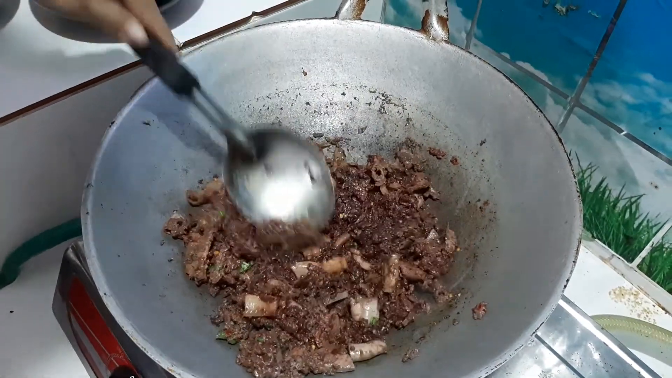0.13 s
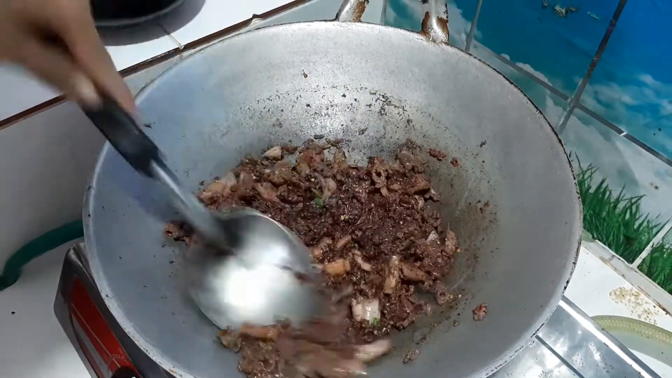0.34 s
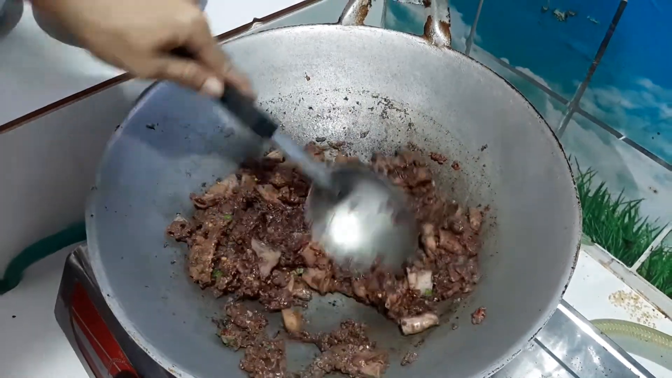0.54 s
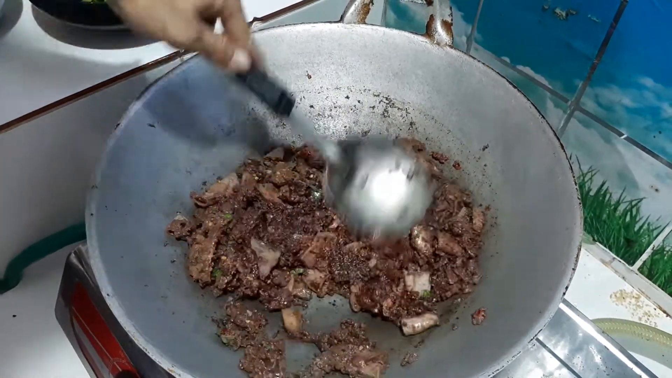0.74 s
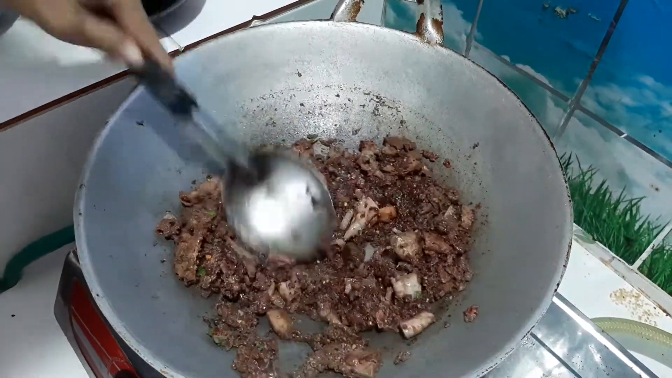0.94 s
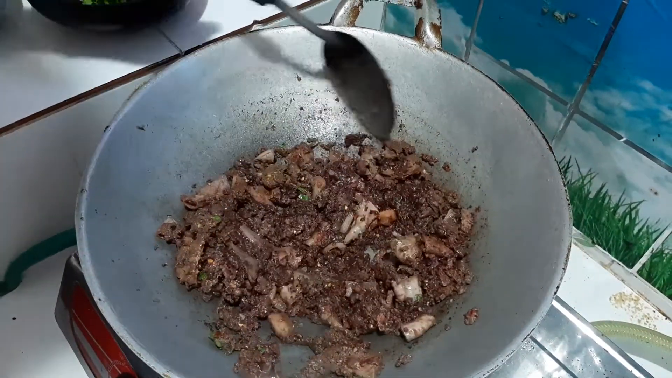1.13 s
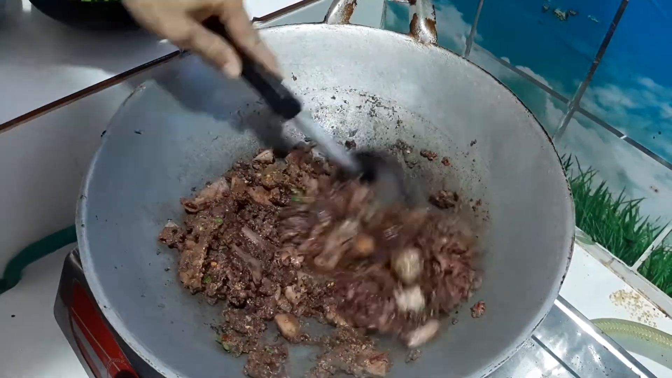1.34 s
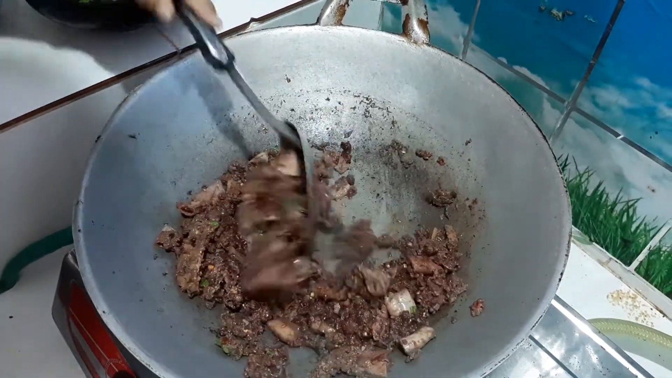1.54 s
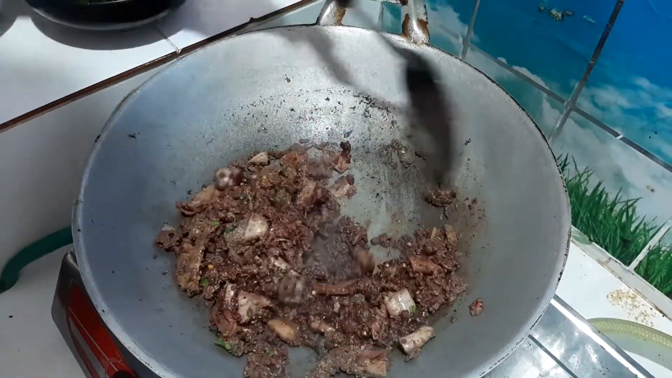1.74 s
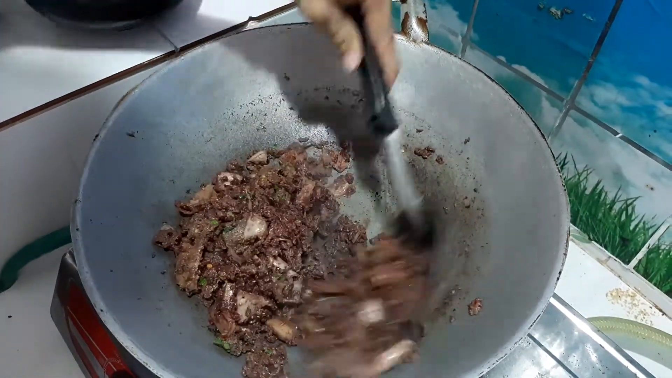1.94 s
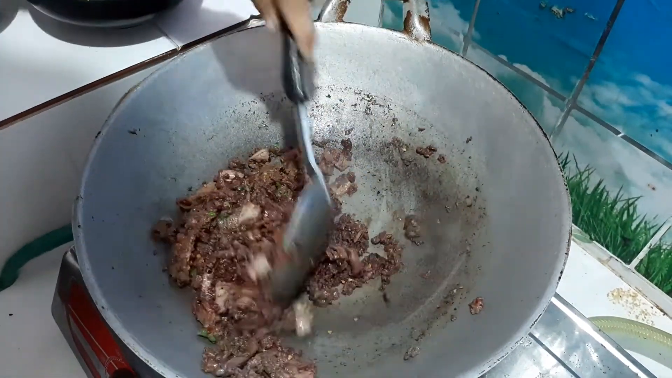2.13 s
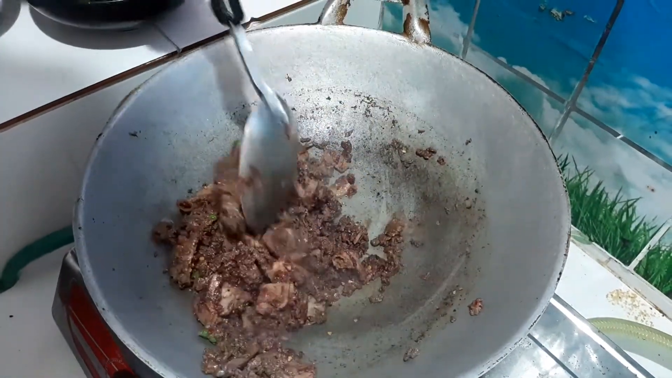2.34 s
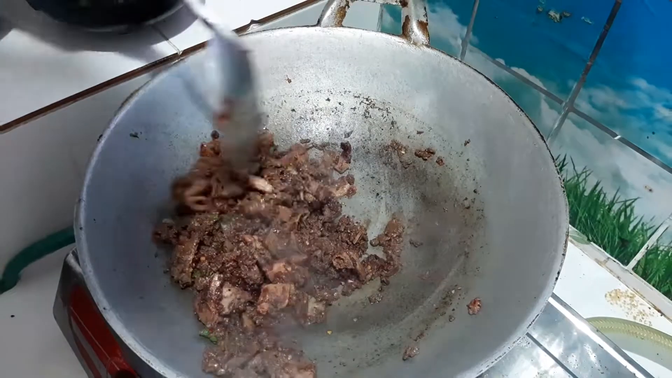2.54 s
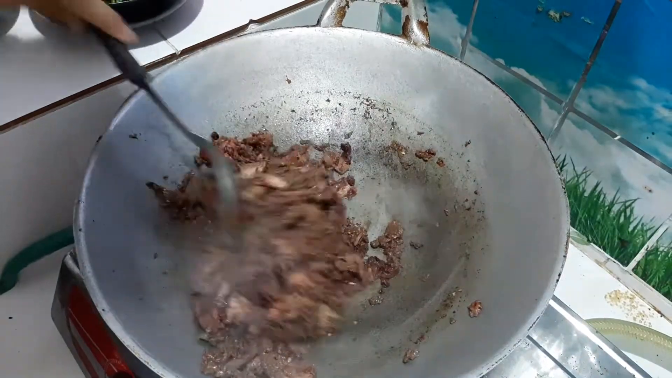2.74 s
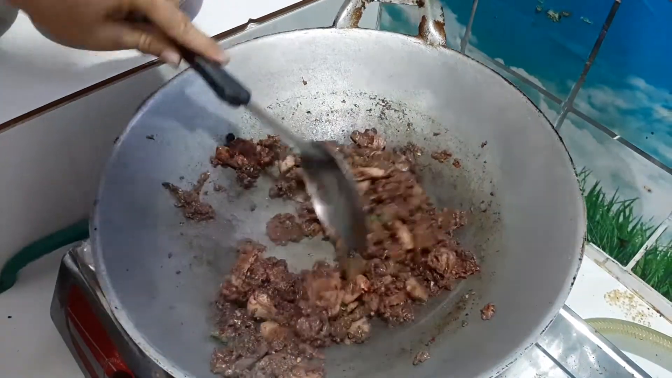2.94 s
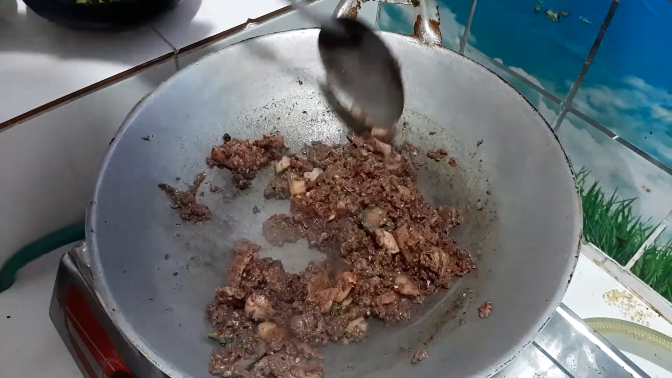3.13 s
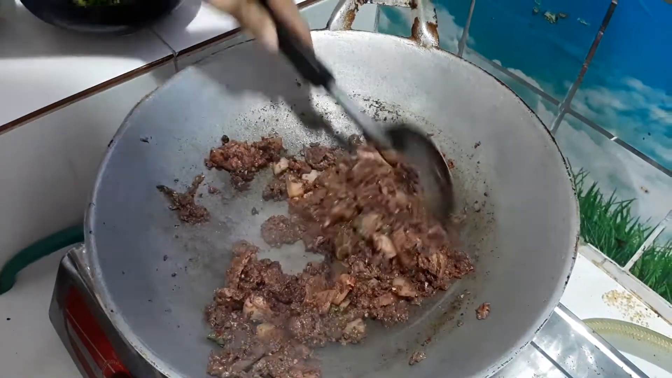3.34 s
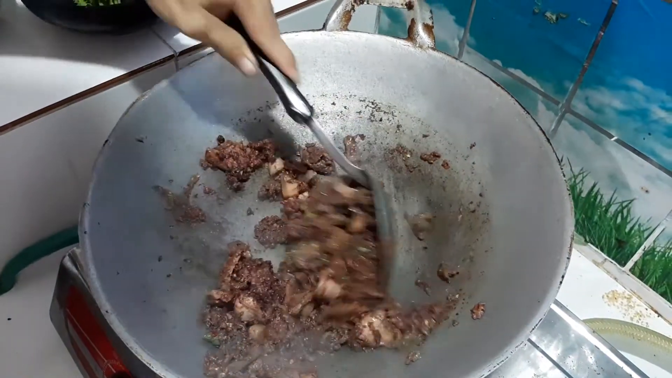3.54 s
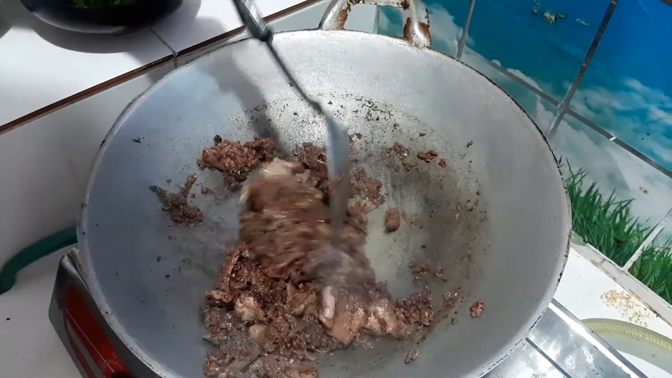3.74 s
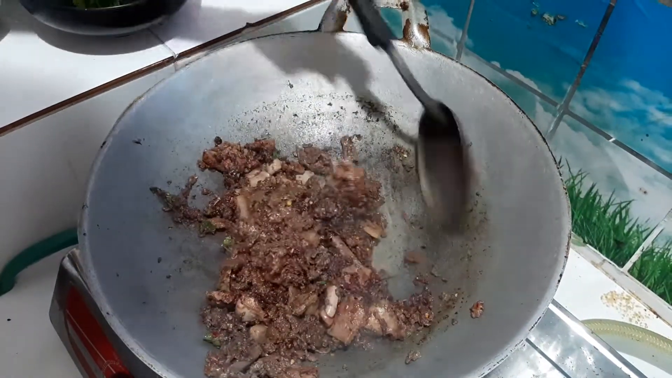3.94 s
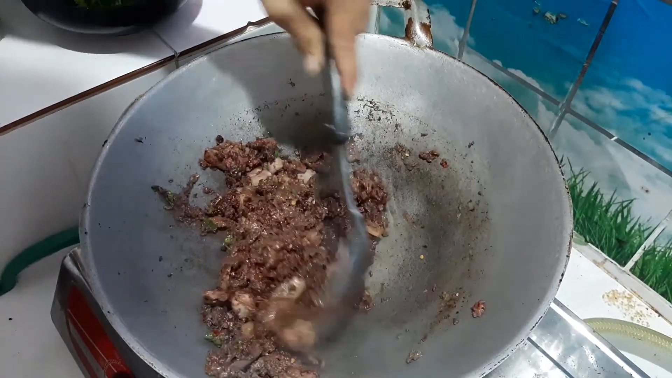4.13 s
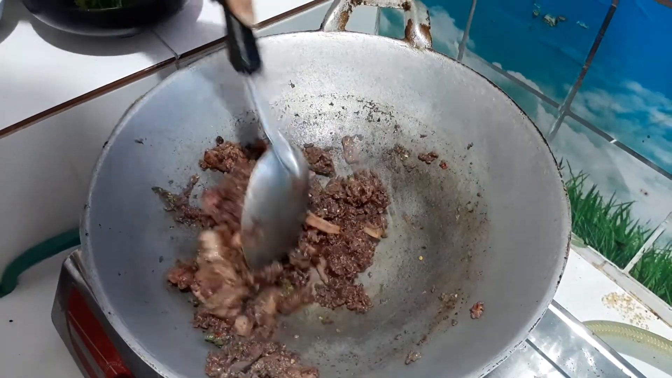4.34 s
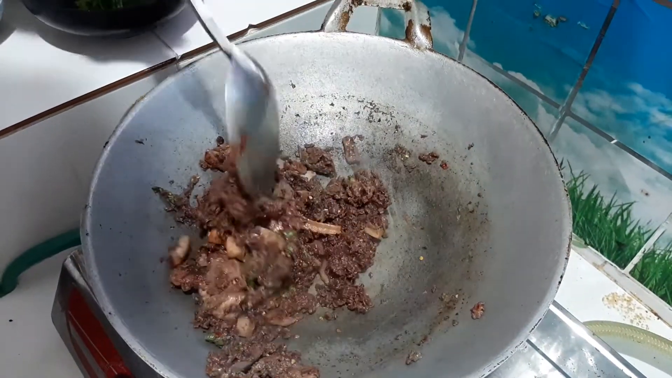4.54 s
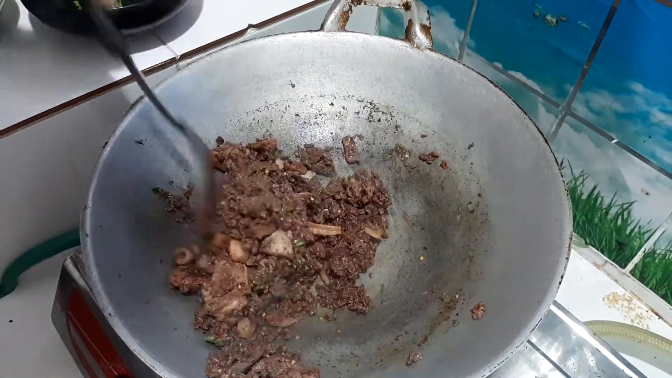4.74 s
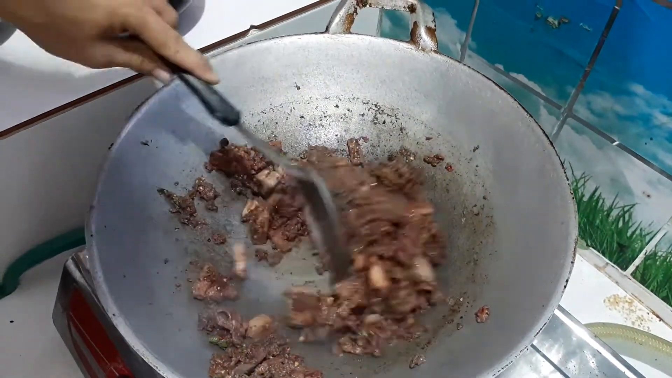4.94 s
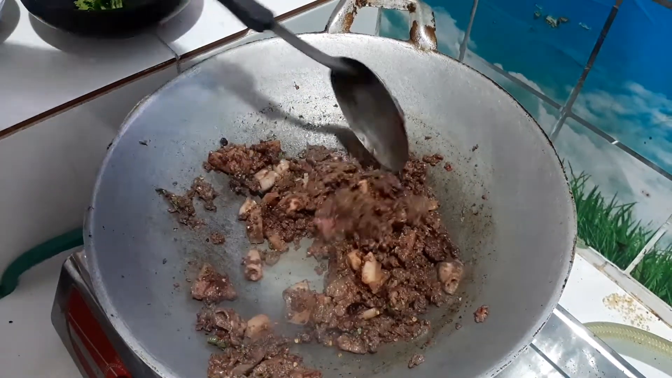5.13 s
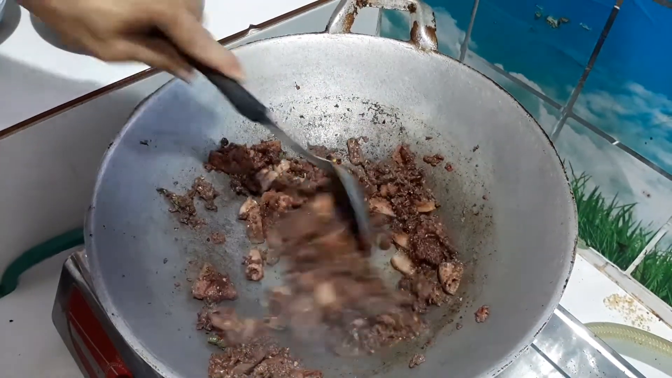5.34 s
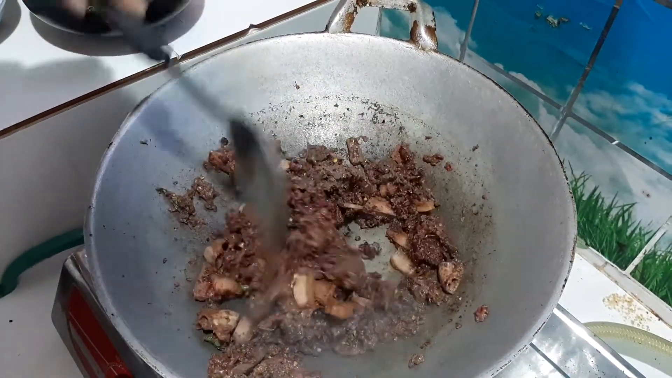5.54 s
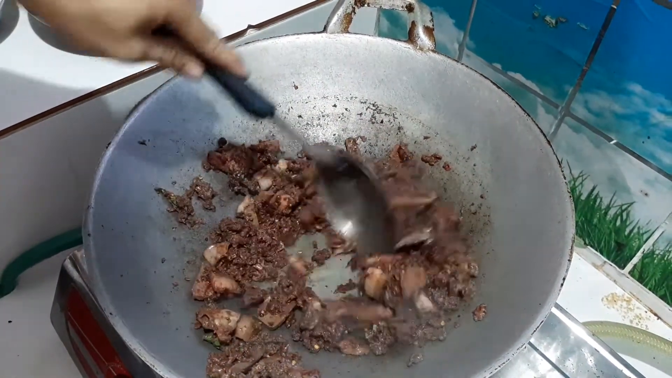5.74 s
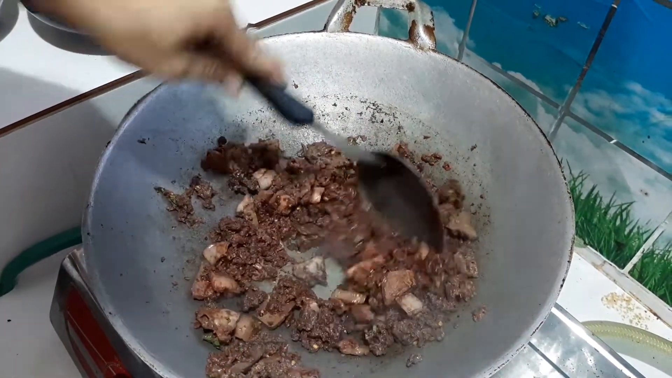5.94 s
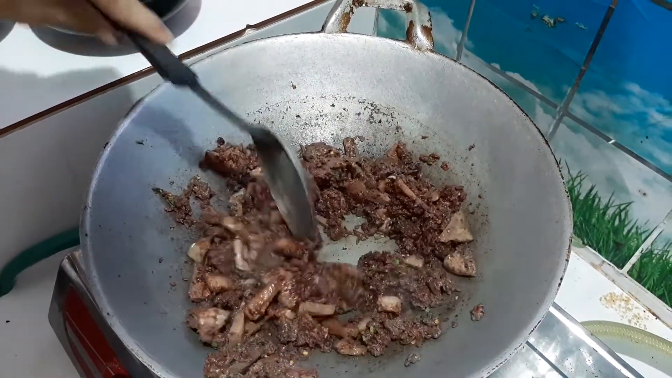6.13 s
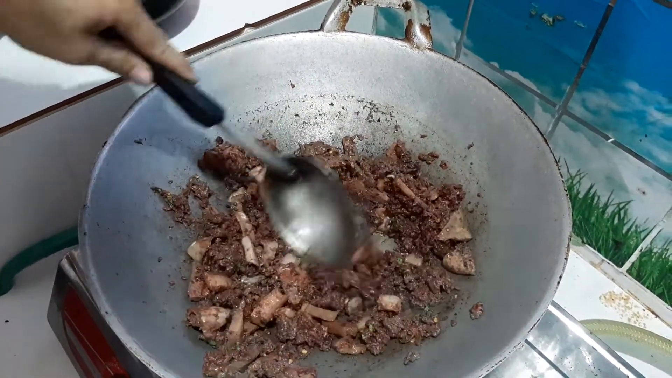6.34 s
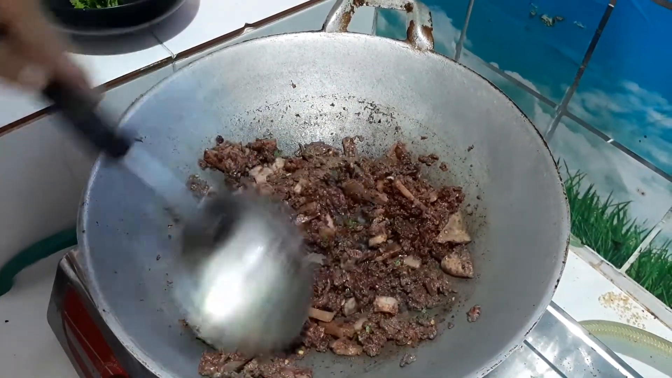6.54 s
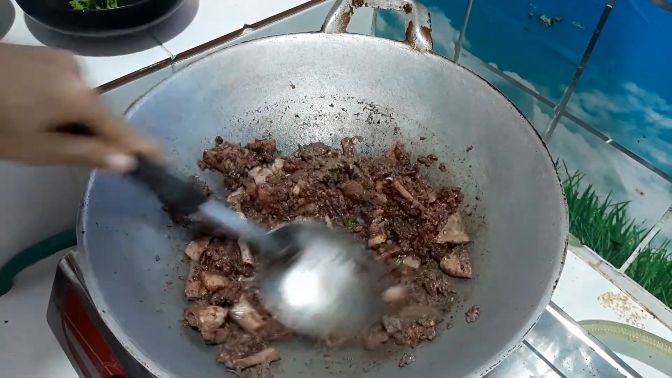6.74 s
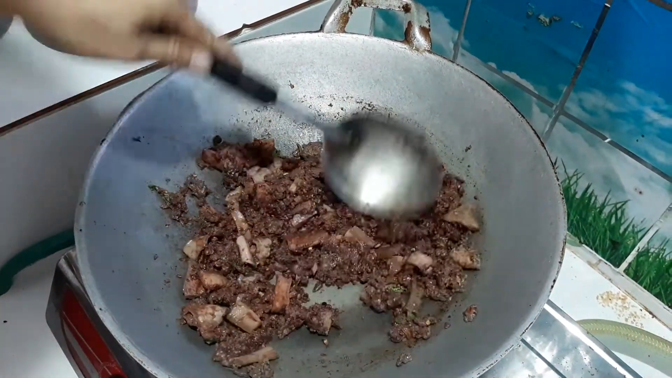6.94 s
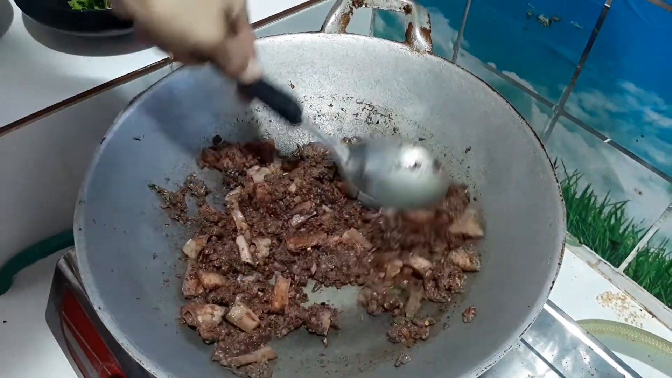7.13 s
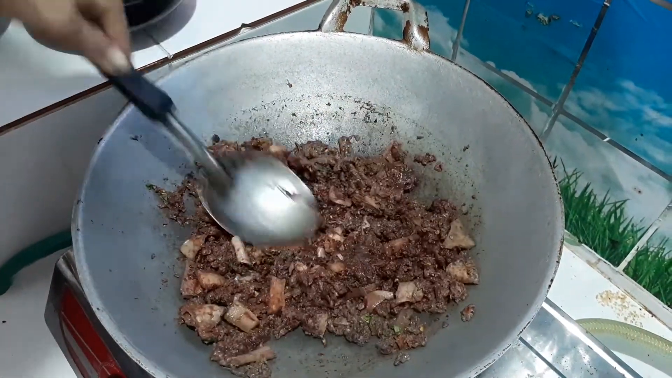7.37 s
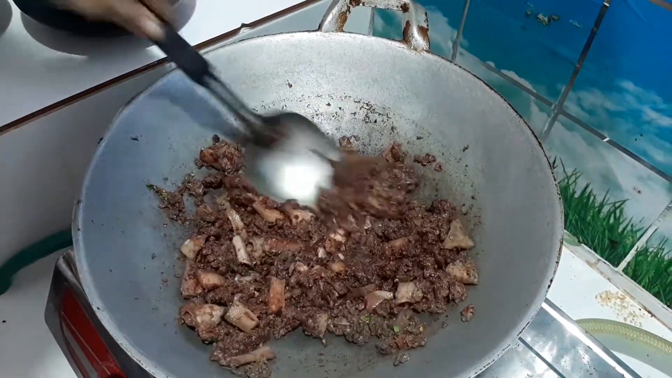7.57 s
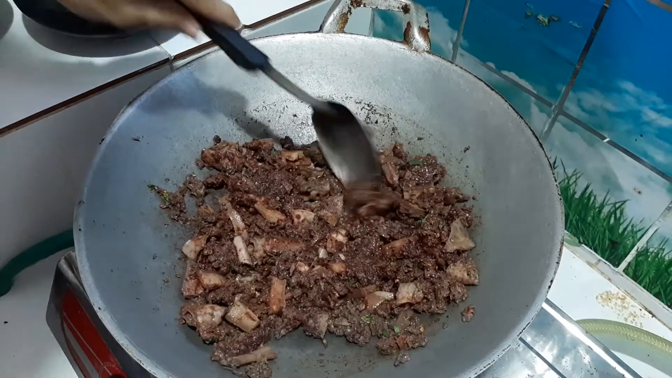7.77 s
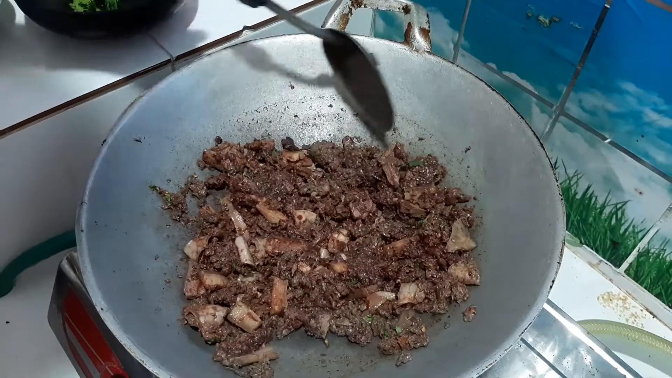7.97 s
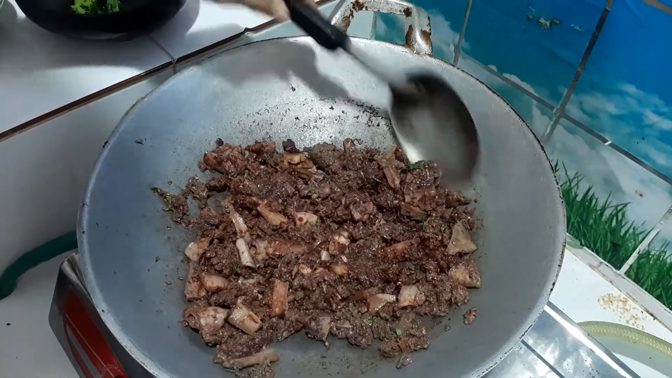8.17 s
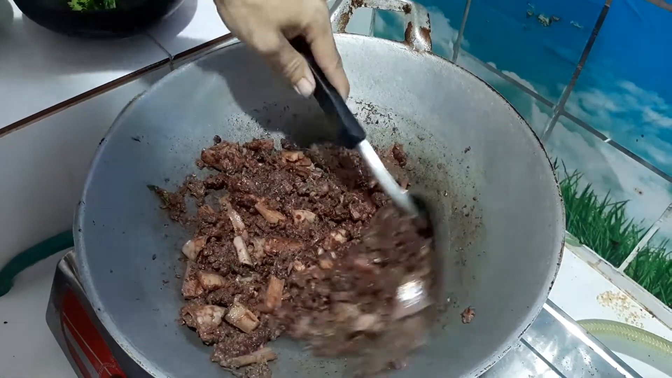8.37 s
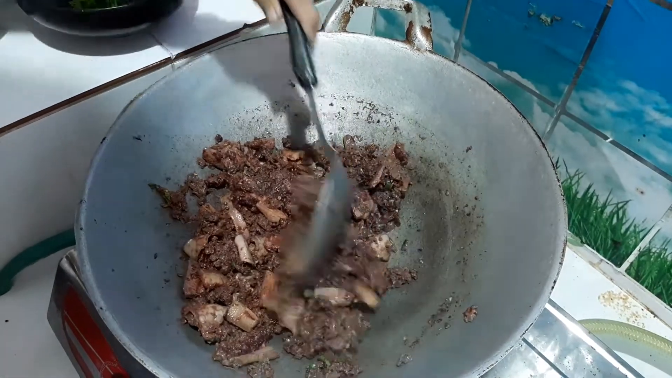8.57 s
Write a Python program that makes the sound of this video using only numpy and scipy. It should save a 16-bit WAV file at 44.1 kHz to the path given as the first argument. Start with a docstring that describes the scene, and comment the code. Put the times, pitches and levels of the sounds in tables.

```python
"""Minced meat sizzles in an aluminium wok on a gas stove, in a small hard-walled kitchen.
Noise and random impulses, shaped in spectrum and level, make the sizzle, which flares as wet meat meets
hot metal; decaying sines make the pops. A steel ladle knocks (decaying modes), scrapes (impulses through
resonances), shoves and groans (a windowed sine), and moist meat squelches (soft impulses).
Low noise rumbles as the gas flame; decaying noise gives the ladle's sounds and the pops their room."""
import sys
import numpy as np
from scipy import signal
from scipy.fft import rfft, irfft, next_fast_len
from scipy.io import wavfile
from scipy.ndimage import map_coordinates

SR = 44100
rng = np.random.default_rng(int(sys.argv[2]) if len(sys.argv) > 2 else 0)


def bounce(signal):
    """Save signal as a 16-bit WAV file at the path given by the first command-line argument."""
    frames = np.transpose(np.atleast_2d(signal))
    limited = np.clip(frames, -1, 1)
    pcm = np.round(limited * 32767).astype(np.int16)
    wavfile.write(sys.argv[1], SR, pcm)


N = 379361


# spectrum of the fine fizz: (f/Hz, relative density/dB per Hz)
FIZZ_SPECTRUM = [(1500, -42), (4000, -11), (6500, -4), (8500, -5), (10500, -2), (12200, 0.5), (14000, -0.2),
                 (16000, -3.5)]
# spectrum of the coarser bubbling: (f/Hz, relative density/dB per Hz)
BUBBLING_SPECTRUM = [(100, -23), (300, -9.5), (550, -5), (900, -2), (1400, 1), (1900, 0), (2600, 0.5),
                     (3600, 1.5), (5500, 0.5), (8500, -9.5), (16000, -22.5)]


def sizzle():
    """Superposition: countless bursts merge into a hiss, with the stronger ones crackling on top."""
    fizz_db, bubbling_db = frying()
    flutter_db = 0.43 * wobble(14)  # shared by both layers

    fine = rng.standard_normal((2, N)) + amp(-9.5) * bursts(rate=5000, spread_db=7, life=0.0028)
    fizz = coloured(paired(bowl(fine, echo_db=-26.5)), FIZZ_SPECTRUM)
    fizz_gain = amp(fizz_db + 0.72 + flutter_db + 0.65 * wobble(40))

    coarse = rng.standard_normal((2, N)) + amp(-4) * bursts(rate=1800, spread_db=2.5, life=0.0048)
    bubbling = coloured(paired(bowl(coarse, echo_db=-20.5)), BUBBLING_SPECTRUM)
    bubbling_gain = amp(bubbling_db - 1.5 + flutter_db + 0.58 * wobble(25))
    return fizz_gain * fizz + bubbling_gain * bubbling


# wet meat meets hot metal, flares and dries:
# (start t/s, rise t/s, hold t/s, relative fizz level/dB, relative bubbling level/dB, drying rate/dB per s)
FLARE_EVENTS = [(0.0, 0.8, 0.38, -36, -35, 20), (0.68, 0.11, 0.02, -38, -43, 42),
                (1.3, 0.066, 0.02, -37, -42, 55), (2.465, 0.1, 0.31, -25.5, -32, 8.5),
                (3.24, 0.035, 0.01, -26, -42, 63), (3.953, 0.44, 0.19, -38, -41, 14),
                (4.88, 0.1, 0.14, -37, -59, 0), (5.713, 0.056, 0.41, -36, -41, 0.5),
                (6.3, 0.82, 0.36, -35, -37.5, 3), (7.467, 0.091, 0.12, -32.5, -37, 10),
                (8.07, 0.066, 0.04, -30.5, -35, 19)]
REST_FIZZ_DB, REST_BUBBLING_DB = -37, -38  # between stirs, on the same scale


def frying():
    """Power addition: each flare rises, holds and dries away on top of the resting sizzle; levels in dB."""
    t = np.arange(N) / SR
    power = amp([[REST_FIZZ_DB], [REST_BUBBLING_DB]]) ** 2
    for start, rise, hold, fizz_db, bubbling_db, drying in FLARE_EVENTS:
        onset = np.clip((t - start) / rise, 0, 1)
        drying_time = np.maximum(t - start - rise - hold, 0)
        flare = onset * amp(-drying * drying_time)
        power = power + (amp([[fizz_db], [bubbling_db]]) * flare) ** 2
    return 10 * np.log10(power)


def bursts(rate, spread_db, life, count=3):
    """Impulse response: steam bubbles burst at several spots; the bowl smears each into a tiny crackle."""
    t = np.arange(SR // 100) / SR
    total = 0
    for _ in range(count):
        smear = rng.standard_normal((2, len(t))) * amp(-60 * t / life)  # life is a t60 in s
        total = total + through(impulses(rate / count, spread_db), smear)
    return unit(total)


def bowl(x, echo_db, count=8):
    """Early reflection: x with a cluster of quick echoes off the wok's wall."""
    taps = np.zeros((2, SR // 150))
    for side in taps:
        delays = rng.integers(SR // 2000, len(side), count)
        side[delays] = amp(echo_db) * rng.choice([-1, 1], count)
    return x + through(x, taps)


# single fat bubbles bursting near the top of the meat: (t/s, f/Hz, relative peak level/dB)
LOUD_POPS = [(0.062, 1600, -28), (.627, 2100, -37), (6.346, 1490, -31)]


def pops(pitch_hz=2600, size_db=-43, cycles=28, count=240):
    """Damped oscillation: larger bubbles ping briefly, falling 60 dB in a set number of cycles."""
    out, t = np.zeros((2, N)), np.arange(SR // 25) / SR
    # faint ones are scattered throughout, within two octaves of pitch_hz
    faint = [(u * N / SR, pitch_hz * 4 ** (2 * v - 1), size_db + 8 * w ** 3)
             for u, v, w in rng.random((count, 3))]
    for s, hz, db in [*LOUD_POPS, *faint]:
        ping = np.sin(2 * np.pi * (hz * t + rng.random((2, 1))))
        add(out, s, amp(db - 60 * t * hz / cycles) * ping)
    return kitchen(out, wet_db=-9)


# the ladle lands; the spot decides which modes ring: (t/s, then relative levels of
# boom level/dB, bong level/dB, clang level/dB, clack level/dB, crack level/dB, tick level/dB)
KNOCK_EVENTS = [(1.159, -32, -30.5, -29.5, -28, -18.5, -30), (1.8044, -31.5, -30, -43, -30.5, -20, -22),
                (3.244, -33, -34.5, -29, -24, -26.5, -39), (3.979, -34, -29.5, -40, -33.5, -29.5, -48),
                (3.992, -47, -44, -41, -34, -26.5, -29.5), (4.789, -31, -23.5, -22.5, -27.5, -23.5, -29.5),
                (7.138, -49, -42.5, -45, -42, -44, -48), (8.102, -40, -40, -36.5, -34, -39, -45)]
# those six families of modes, boom to tick: (lower f/Hz, upper f/Hz)
MODE_FAMILIES = [(100, 380), (380, 780), (780, 1700), (1700, 2800), (2800, 7800), (7800, 16000)]


def knocks(chatter=0.0029, clink_db=22):
    """Modal excitation: each blow of the ladle wakes the families of modes in its own proportion."""
    out, t = np.zeros((2, N)), np.arange(SR // 2) / SR
    for s, *levels in KNOCK_EVENTS:
        ring = wok(dense_db=19.5, dense_t60=0.04, scatter_db=0.5) + amp(clink_db) * ladle_ring(t)
        # steel chatters on the wall for a moment, so the ring takes that long (s) to build
        ring = ring * np.sqrt(1 - np.exp(-t / chatter))
        for band, db in zip(MODE_FAMILIES, levels):
            family = signal.sosfilt(signal.butter(3, band, "band", fs=SR, output="sos"), ring)
            strike_rms = np.std(family[:, :SR // 40])
            add(out, s, amp(db) * family / strike_rms)
    return kitchen(amp(1) * out, wet_db=-7.5)


# the wok's clear modes: (f/Hz, relative level/dB, t60/s)
WOK_MODES = [(125.3, -4, 0.41), (189.7, -4, 0.3), (214.9, -0.5, 0.31), (230.8, 0.5, 0.22), (273, -6, .25),
             (301.5, 3.5, 0.24), (325, 0, 0.17), (384, -9.5, 0.2), (471, -5, 0.28), (496.3, 1, 0.28),
             (582.4, 0, 0.23), (689, -2.5, 0.21), (742, 0.5, 0.1), (874, -0.5, 0.089), (1008, -0.5, .13),
             (1372, -10.5, 0.17), (1492, -5, 0.094), (2290, 18.5, 0.021), (3000, -28, 0.14),
             (3480, 1, 0.11), (3870, 4.5, 0.097), (4240, -6, 0.078), (4830, 5, 0.062), (5364, 4, 0.05)]


def wok(dense_db, dense_t60, scatter_db=2.0, port_hz=1500):
    """Modal superposition: the wok's clear modes from one spot over a crowd of short-lived ones."""
    t = np.arange(SR // 2) / SR
    ring = amp(dense_db - 60 * t / dense_t60) * paired(rng.standard_normal((2, len(t))))
    for hz, db, t60 in WOK_MODES:
        # higher modes reach left and right further out of step, up to a quarter cycle from port_hz
        lag = np.array([[1], [-1]]) * rng.choice([-1, 1]) * min(hz / port_hz, 1) * np.pi / 4
        level_db = db + scatter_db * rng.standard_normal() - 60 * t / t60
        ring += rng.choice([-1, 1]) * amp(level_db) * np.sin(2 * np.pi * hz * t + lag)
    return ring


# broad resonances of the ladle's bowl, pressed against the wok; scrapes ring them too:
# (f/Hz, width f/Hz, relative level/dB)
LADLE_RESONANCES = [(670, 120, -13), (1460, 150, -11.5), (2360, 400, -8), (3094, 310, -6),
                    (3596, 260, -2.5), (4234, 194, -1.5), (4760, 144, -5), (5300, 200, -6.5),
                    (6200, 100, -10.5), (7050, 260, -7), (7900, 280, -9), (9200, 350, -23),
                    (10030, 95, -11.5), (10900, 480, -8), (13400, 2500, -11)]


def ladle_ring(t):
    """Damped resonance: the struck ladle's brief, hand-damped clink; wider resonances die sooner."""
    brief = t[:SR // 25]
    clink = 0
    for hz, width, db in LADLE_RESONANCES:
        tone = np.sin(2 * np.pi * (hz * brief + rng.random((2, 1))))
        clink = clink + amp(db) * np.exp(-np.pi * width * brief) * tone
    return np.pad(clink, ((0, 0), (0, len(t) - len(brief))))


def scrapes(favour_db=6, reach=0.2, waver_db=3.5):
    """Stick-slip: the steel edge rings the ladle's resonances in turn as the contact point travels."""
    pressure, contact_hz = edge()
    slips = impulses(rate=9000, spread_db=1.0) * amp(0.64 * wobble(220))
    # each slip reaches left and right along its own paths
    paths = rng.standard_normal((2, N)) * slips
    rasp, power = np.zeros((2, N)), np.zeros(N)
    waver = wobble(70)
    for hz, width, db in LADLE_RESONANCES:
        favour = np.exp(-(np.log(hz / contact_hz) / reach) ** 2)
        own_waver = np.roll(waver, rng.integers(N))
        gain = amp(db + favour_db * favour + waver_db * own_waver)
        rasp += gain * unit(signal.lfilter(*signal.iirpeak(hz, hz / width, SR), paths))
        power += gain ** 2
    # dividing by the summed power leaves the loudness to the pressure
    return kitchen(amp(1.5) * pressure * unit(rasp / np.sqrt(power)), wet_db=-9.0)


# the ladle's edge swells into bare metal, bites, then trails off lightly: (start t/s, swell t/s, bite t/s,
# trail t/s, relative level/dB, favoured f/Hz at first, favoured f/Hz at the end of the bite)
SCRAPE_EVENTS = [(1.238, 0.02, 0.042, 0.002, -32, 3900, 1500),
                 (1.862, 0.037, 0.054, 0.079, -20, 3100, 4500),
                 (2.72, 0.031, 0.015, 0.05, -26.5, 4300, 4300),
                 (3.985, 0.065, 0.045, 0.087, -21, 2900, 5830),
                 (4.81, 0.014, 0.025, 0.048, -32, 5000, 4700),
                 (7.13, 0.012, 0.022, 0.02, -34.5, 4300, 4300), (8.17, 0.13, 0.075, 0.015, -30, 4800, 2200)]
LIFT_S, EDGE_FADE_S = 0.024, 0.012  # the hand eases off; the edge meets or leaves the metal
TRAIL_HZ = 4300  # the resonance that a lightly trailing edge favours
# against the bite: first touch, light trailing, a last catch before it leaves
ENTRY_DB, TRAIL_DB, CATCH_DB = -11, -12.5, -11


def edge():
    """Contact mechanics: the edge's pressure as a gain, and the resonance in Hz its position favours."""
    t = np.arange(N) / SR
    pressure, contact_hz = np.zeros(N), np.full(N, float(TRAIL_HZ))
    for s, swell, bite, trail, db, first_hz, last_hz in SCRAPE_EVENTS:
        stages = s + np.cumsum([0, swell, bite, LIFT_S, trail])
        on = (t >= s) & (t < stages[-1])
        touch = np.minimum(np.minimum(t[on] - s, stages[-1] - t[on]) / EDGE_FADE_S, 1)
        stage_db = np.interp(t[on], stages, [ENTRY_DB, 0, 0, TRAIL_DB, CATCH_DB])
        pressure[on] += touch * amp(db + stage_db)
        contact_hz[on] = np.interp(t[on], [s, stages[2], stages[3]], [first_hz, last_hz, TRAIL_HZ])
    return pressure, contact_hz


# the ladle pushes through meat: (greatest force t/s, rise t/s, fall t/s, relative level/dB)
SHOVE_EVENTS = [(0.56, 0.14, 0.1, -48), (0.935, 0.07, 0.045, -29.5), (1.22, 0.015, 0.035, -37),
                (1.33, 0.032, 0.034, -37), (1.87, 0.039, 0.033, -27.5), (2.02, 0.019, 0.027, -40),
                (2.78, 0.055, 0.057, -33), (2.89, 0.05, 0.11, -26.5), (3.6, 0.1, 0.049, -41),
                (4.975, 0.035, 0.026, -34.5), (5.685, 0.014, 0.03, -44), (6.49, 0.04, 0.058, -46.5),
                (7.195, 0.015, 0.023, -32.5), (8.235, 0.054, 0.032, -33.5), (8.41, 0.048, 0.04, -46.5)]
# force spectrum of the ladle cushioned by meat: (f/Hz, relative level/dB)
CUSHIONED_FORCE = [(40, -20), (110, -3), (200, 3.5), (380, 3), (550, -2), (900, -3), (1500, -17),
                   (4000, -30), (12000, -50)]


def shoves():
    """Soft-contact excitation: meat cushions the ladle, so rubbing and tumbling drive mainly low modes."""
    bumps = impulses(rate=1200, spread_db=3.5)
    ringing = through(bumps, wok(dense_db=28.5, dense_t60=0.059, scatter_db=1))
    rumble = coloured(ringing, CUSHIONED_FORCE)
    return kitchen(amp(-3) * swells(SHOVE_EVENTS) * rumble, wet_db=-5.5)


# stick-slip locks briefly on a low mode: (start t/s, length t/s, f/Hz, relative level/dB)
GROAN_EVENTS = [(0.836, 0.034, 312, -45), (1.854, 0.044, 298.6, -26), (2.735, 0.048, 580, -31.5),
                (3.97, 0.047, 622, -31.5), (8.369, 0.057, 640, -47)]


def groans():
    """Mode locking: the dragged ladle judders in step with one mode for a short spell."""
    out = np.zeros(N)
    for s, length, hz, db in GROAN_EVENTS:
        t = np.arange(int(length * SR)) / SR
        judder = np.hanning(len(t)) * np.sin(2 * np.pi * hz * t)
        add(out, s, amp(db) * unit(judder))
    return kitchen(out, wet_db=-7.5)


# wet meat slides over itself: (fastest sliding t/s, rise t/s, fall t/s, relative level/dB)
SQUELCH_EVENTS = [(0.5, 0.28, 0.5, -48), (1.29, 0.056, 0.05, -36.5), (2.8, 0.1, 0.13, -42),
                  (7.59, 0.12, 0.12, -39.5)]
# spectrum of the crackle of wet meat: (f/Hz, relative density/dB per Hz)
WET_SPECTRUM = [(200, -19), (400, -13), (900, -9), (1450, 0), (2200, -1.5), (3500, -19), (8000, -24)]


def squelch():
    """Film rupture: sticky films between the morsels part in a soft crackle."""
    crackle = paired(bursts(rate=1400, spread_db=2, life=0.0028))
    return swells(SQUELCH_EVENTS) * coloured(crackle, WET_SPECTRUM)


def swells(rows):
    """Amplitude envelope: the gain of pushes that build to a peak and die away along a bell curve."""
    t = np.arange(N) / SR
    total = 0
    for s, rise, fall, db in rows:
        distance = np.abs(t - s) / np.where(t < s, rise, fall)
        total = total + amp(db) * np.exp(-np.minimum(distance, 10) ** 2)
    return total


# spectrum of the gas burner and kitchen: (f/Hz, relative density/dB per Hz)
BURNER_SPECTRUM = [(20, -25), (40, -14), (60, 5), (76, -2), (95, -3), (125, 0.5), (170, -10), (300, -15),
                   (600, -47), (2000, -46)]


def burner():
    """Turbulent combustion noise: the gas flame's low, unsteady rumble."""
    return amp(-56.5 + wobble(6)) * coloured(paired(rng.standard_normal((2, N))), BURNER_SPECTRUM)


# reverberation time of the kitchen: (f/Hz, t60/s)
KITCHEN_T60 = [(100, 0.68), (500, 0.44), (2000, 0.47), (6000, 0.34), (15000, 0.16)]


def kitchen(x, wet_db):
    """Reverberation: x with the room's tail, whose noise decays at a rate set by frequency."""
    _, t, z = signal.stft(noise := paired(rng.standard_normal((2, SR // 2))), SR, nperseg=256)
    hz = np.fft.rfftfreq(256, 1 / SR)
    decay = amp(-60 * t / along(KITCHEN_T60, hz)[:, None])
    tail = signal.istft(z * decay, SR, nperseg=256)[1]
    # the tail starts 5 ms after the direct sound
    tail = np.pad(tail / np.linalg.norm(tail[0]), ((0, 0), (SR // 200, 0)))
    return x + amp(wet_db) * through(x, tail)


# likeness of left and right: (f/Hz, correlation)
LIKENESS = [(60, 0.76), (200, 0.69), (450, 0.76), (1200, 0.33), (2200, -0.11), (15000, -0.035)]


def paired(x):
    """Interaural coherence: two unrelated signals become alike in the bass, unrelated in the treble."""
    likeness = along(LIKENESS, np.fft.rfftfreq(x.shape[1], 1 / SR))
    turn = np.arccos(np.clip(likeness, -1, 1)) / 2
    mid, side = irfft(rfft(x) * [np.cos(turn), np.sin(turn)], x.shape[1])
    return np.array([mid + side, mid - side])


def impulses(rate, spread_db):
    """Poisson-like process: random tiny impulses, rate a second, of unequal size, at rms 1."""
    hits = (rng.random(N) < rate / SR) * rng.choice([-1, 1], N)
    return unit(hits * amp(spread_db * np.minimum(rng.standard_normal(N), np.pi)))


def wobble(rate):
    """Random modulation: a smooth curve with rate knots a second."""
    knots = rng.standard_normal(int(N * rate / SR) + 4)
    return map_coordinates(knots, [np.arange(N) * rate / SR])


def coloured(x, spectrum):
    """Spectral shaping: x weighted by the given spectrum, at rms 1."""
    return unit(filtered(x, lambda hz: amp(along(spectrum, hz))))


def filtered(x, response):
    """Linear filtering: x times a response of frequency."""
    m = next_fast_len(N + SR // 2)
    return irfft(rfft(x, m) * response(np.fft.rfftfreq(m, 1 / SR)), m)[..., :N]


def through(x, response):
    """Convolution: x played through a stereo impulse response."""
    return signal.fftconvolve(np.atleast_2d(x), response, axes=1)[:, :N]


def add(track, s, sound):
    """Superposition: mix a sound into the track at s seconds."""
    part = track[..., round(s * SR):][..., :sound.shape[-1]]
    part += sound[..., :part.shape[-1]]


def along(points, hz):
    """Logarithmic frequency scale: (f/Hz, value) points interpolated on a log axis."""
    f, v = np.transpose(points)
    return np.interp(np.log(hz + 1), np.log(f), v)


def amp(db):
    """Level law: decibels to gain."""
    return 10 ** (np.asarray(db) / 20)


def unit(x):
    """Normalisation: x at rms 1."""
    return x / np.sqrt(np.mean(x ** 2) + 1e-20)


# balance of the frying and the flame: (f/Hz, left minus right level/dB)
STEREO_LEAN = [(80, 5.5), (400, 2.5), (1300, 1.2), (5500, 0), (9000, 2), (13000, -1.5)]


def scene():
    """Level-difference panning: frying and flame lean by frequency, the ladle just left of centre."""
    steady = filtered(sizzle() + pops() + burner(),
                      lambda hz: amp(np.outer([.5, -.5], along(STEREO_LEAN, hz))))
    ladle = knocks() + scrapes() + shoves() + groans() + squelch()
    return steady + ladle * amp(np.array([[.5], [-.5]]) * 1.4)  # left minus right, dB


TOP_HZ = 16000


def record(dry):
    """Soft saturation and band limiting: the highest peaks are rounded and nothing from TOP_HZ up is kept."""
    rounded = dry / (1 + np.abs(dry / .95) ** 6) ** (1 / 6)
    return filtered(rounded, lambda hz: hz < TOP_HZ)


dry = scene()
out = record(dry)
bounce(out)
```